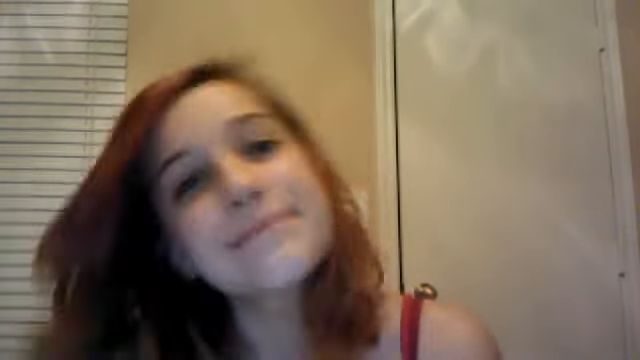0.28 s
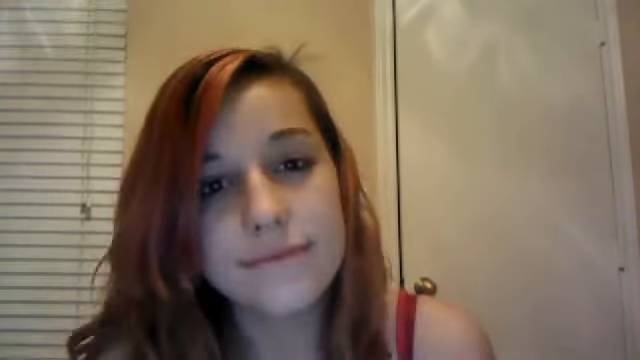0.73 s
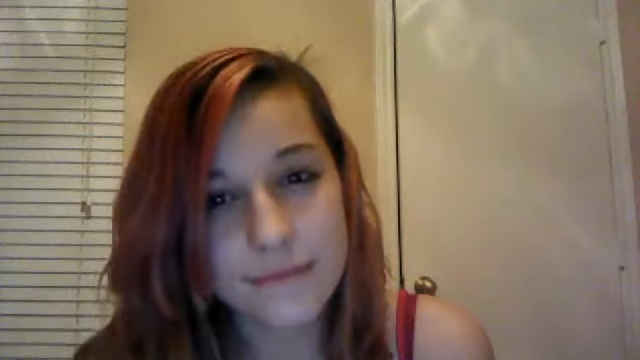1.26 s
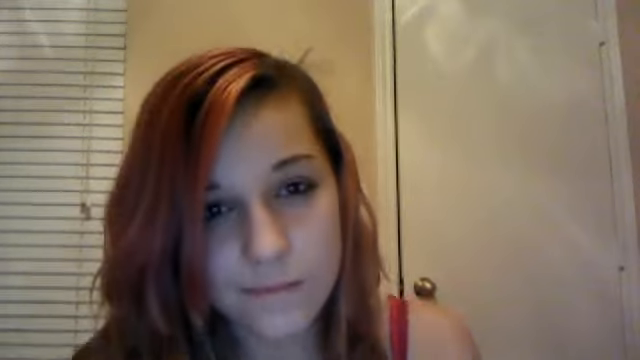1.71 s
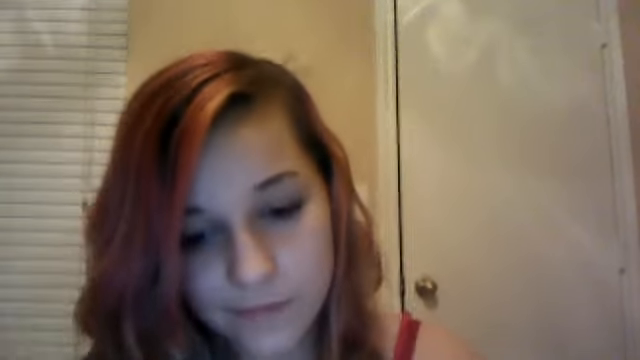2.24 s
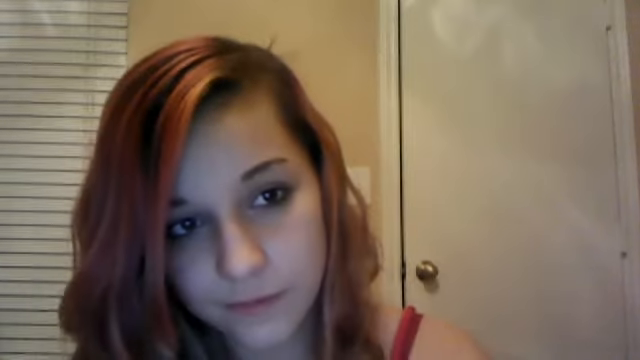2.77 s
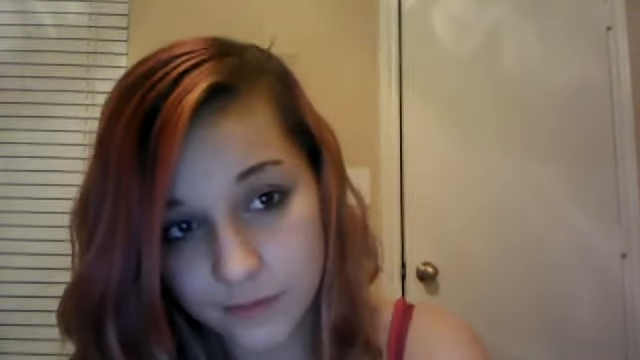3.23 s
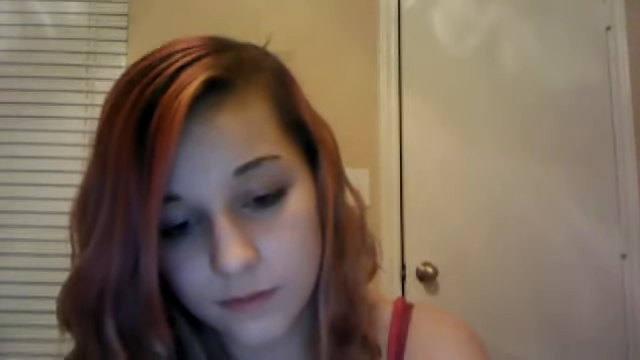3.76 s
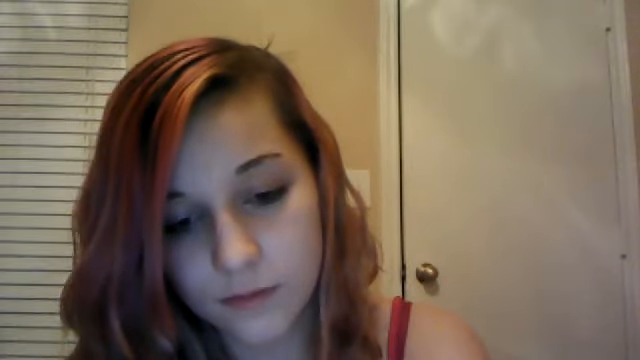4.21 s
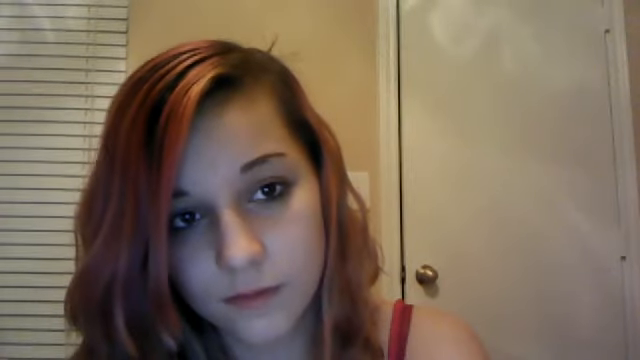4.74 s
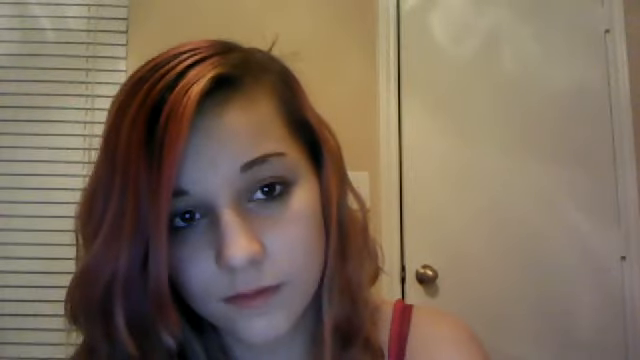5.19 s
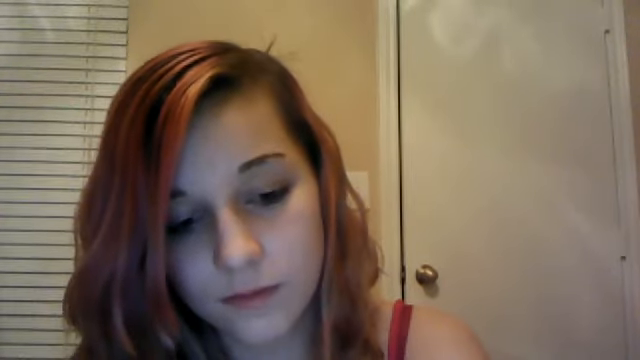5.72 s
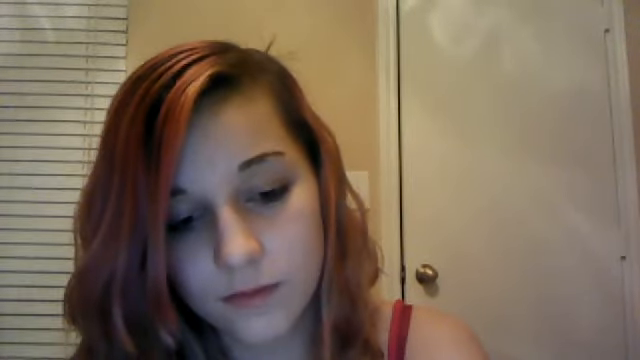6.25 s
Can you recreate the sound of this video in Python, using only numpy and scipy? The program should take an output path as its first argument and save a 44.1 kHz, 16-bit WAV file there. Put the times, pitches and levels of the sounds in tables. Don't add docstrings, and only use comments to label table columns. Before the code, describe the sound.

A quiet room heard by a laptop's built-in microphone: low fan hum, soft rumble, hiss and a faint thin whine whose treble flickers. Only one light tick comes at 0.8 s. At 1.35 s a soft press, at 1.45 s a duller tap, then at 1.61 s a hard, bouncing button snap. Sharp pressure pops follow at about 1.75 s, with a dull swipe of skin at 1.8 s. Small ticks patter from 2.0 to 2.35 s, then strong low key thumps with bright rattles at 2.4, 2.57 and 2.92 s. From 3.3 to 4.5 s strokes come quickly, crisp clicks mixed with case knocks, desk thuds and softer key returns, loudest ticks near 3.6 and 4.3 s. Sparse faint touches and a light brush fill 4.5 to 5.6 s. Firm strokes resume at 5.75, 6.03, 6.2 and 6.39 s, ending under a short scuff and rising slide.

```python
import sys
import numpy as np
from scipy import signal
from scipy.fft import rfft, irfft
from scipy.io import wavfile
from scipy.ndimage import uniform_filter1d

SR = 44100
rng = np.random.default_rng(int(sys.argv[2]) if len(sys.argv) > 2 else 0)


def store_wav(level_fs):
    pcm = np.round(np.clip(np.atleast_2d(level_fs), -1, 1) * 32767)
    wavfile.write(sys.argv[1], SR, pcm.T.astype(np.int16))


def boost_factor(decibels):
    exponent = np.asarray(decibels, float) / 20
    return 10 ** exponent


N = 285327
FRAME = 512

# (time [s], peak [dB], width [ms])
POPS = [
    (1.351, -43, 2.1),
    (1.752, -10, 0.27),
    (1.7713, -9.5, 0.088),
    (1.774, -22, 0.1),
]
# (time [s], dull level [dB], bright level [dB])
SLIDES = [
    [(1.78, -49, -50), (1.814, -28.5, -47), (1.84, -60, -59)],
    [(1.95, -62, -72), (1.976, -50, -53), (2.1, -56.5, -80)],
    [(5.13, -62, -65), (5.16, -55.5, -56), (5.21, -58, -60)],
    [(6.3, -74, -60), (6.334, -42, -49), (6.345, -53, -60)],
    [(6.36, -46, -63), (6.384, -43.5, -41), (6.47, -38.5, -54.5)],
]
# (time [s], peak [dB])
SNAP = [
    (1.6117, -6),
    (1.6135, -8),
    (1.616, -13),
    (1.6185, -19),
]
# (time of greatest swing [s], case level [dB], case pitch [Hz], case swing [ms], desk level [dB])
PRESSES = [(1.352, -28.5, 210, 5.4, -33.5), (1.613, -23, 193, 7.3, -31), (1.769, -39, 190, 8.2, -27.5),
           (2.398, -8.5, 205, 12, -27.5), (2.57, -8.5, 188, 10.3, -18), (2.922, -5, 234, 10.1, -22.5),
           (3.365, -20.5, 224, 28.5, -41), (3.482, -18, 185, 15, -19), (3.592, -16.5, 173, 10.9, -27),
           (3.734, -28.5, 167, 25.4, -20), (3.883, -27, 204, 8.1, -32), (4.007, -21.5, 209, 4.8, -19.5),
           (4.107, -21, 186, 4.9, -15), (4.191, -24, 185, 11.2, -23.5), (4.313, -22.5, 218, 13, -27),
           (5.747, -19, 154, 6.6, -31), (6.035, -14.5, 169, 15.5, -16.5), (6.195, -11.5, 167, 10.9, -19),
           (6.392, -20.5, 206, 3.3, -30.5)]
# (time of greatest swing [s], case level [dB], case pitch [Hz], case swing [ms], desk level [dB])
RELEASES = [(2.474, -28.5, 206, 18.4, -24), (2.633, -25, 166, 14.5, -19.5), (3, -17.5, 187, 7.5, -24),
            (3.633, -17.5, 186, 7.1, -16), (3.826, -20.5, 175, 12.5, -20), (3.927, -21.5, 172, 10.3, -22.5),
            (4.238, -25.5, 171, 28, -17.5), (4.356, -19.5, 223, 20.7, -20), (4.411, -20, 188, 5.6, -24),
            (6.13, -25.5, 212, 9.5, -18.5), (6.268, -16, 178, 4.4, -31), (6.334, -29.5, 186, 4.4, -41)]
# (time [s], tick level [dB], centre [Hz], knock level [dB], rattle level [dB])
STRIKES = [(2.366, -28.5, 3900, -45, -31), (2.389, -24.5, 4270, -27, -30), (2.557, -19, 4300, -26, -25),
           (2.914, -20, 4360, -24, -29), (3.48, -19.5, 4530, -28.5, -25), (3.591, -12.5, 4800, -28.5, -21),
           (3.717, -32.5, 4360, -37.5, -32.5), (3.798, -29, 4370, -37.5, -34.5),
           (4.001, -23.5, 3700, -37.5, -35.5), (4.308, -12, 4200, -31, -35), (4.344, -19, 4200, -26, -25),
           (5.739, -31, 4400, -35.5, -32.5), (6.03, -22, 4400, -33.5, -30.5),
           (6.193, -19, 3700, -31.5, -45), (6.39, -17.5, 3820, -25.5, -43)]
# (time [s], tick level [dB], centre [Hz], knock level [dB])
TOUCHES = [(.832, -29, 4100, -66), (1.447, -21.5, 1870, -32), (1.631, -33, 2950, -36),
           (1.998, -34.5, 2440, -37.5), (2.099, -34, 3850, -65), (2.183, -32.5, 3780, -47),
           (2.223, -30.5, 4770, -42.5), (2.277, -30, 4130, -48), (2.323, -29.5, 3400, -44),
           (2.469, -32.5, 4470, -35.5), (2.637, -30.5, 3400, -34), (2.998, -26, 4200, -32),
           (3.288, -27.5, 3600, -39), (3.359, -15.5, 4140, -39.5), (3.627, -25, 3900, -34),
           (4.106, -16, 2810, -38), (4.188, -39, 2640, -33), (4.232, -32.5, 3050, -39),
           (4.373, -29, 4230, -51), (4.405, -19, 4110, -33), (4.477, -34.5, 3620, -40.5),
           (4.492, -35, 4100, -72), (4.568, -24, 4860, -34.5), (4.775, -28.5, 3500, -45),
           (5.014, -33.5, 4400, -62), (5.836, -32, 4180, -34), (6.134, -20.5, 3670, -37.5),
           (6.271, -29, 4080, -37)]
# (time of greatest swing [s], peak [dB], pitch [Hz], length [ms])
NUDGES = [
    (2.029, -34.5, 181, 18),
    (3.809, -22.5, 150, 5.2),
    (4.326, -17.5, 211, 13.7),
    (4.774, -39, 225, 22),
    (5.151, -44.5, 211, 42),
    (5.771, -29.5, 156, 33.4),
    (5.838, -39.5, 301, 14.5),
    (6.206, -22.5, 353, 13.2),
]


def rms_one(x):
    return x / np.sqrt(np.mean(x ** 2) + 1e-20)


def in_time(rows):
    s, *columns = np.transpose(rows)
    return [np.interp(np.arange(N) / SR, s, c) for c in columns]


def drift(rate):
    r = np.exp(-80 * np.pi * rate / SR)
    slow = signal.lfilter([1], [1, -2 * r, r * r], rng.standard_normal(N // 40 + 2002))
    slow = slow[2000:]
    return np.interp(np.arange(N) / 40, np.arange(len(slow)), rms_one(slow))


def resonance(x, hz, width):
    r = np.exp(-np.pi * width / SR)
    zeros = np.array([1, 0, -1]) * (1 - r * r) / 2
    return signal.lfilter(zeros, [1, -2 * r * np.cos(2 * np.pi * hz / SR), r * r], x)


def coloured(spectrum):
    hz = np.arange(1, N // 2 + 2) * SR / N
    at, db = np.transpose(spectrum)
    gain = boost_factor(np.interp(np.log(hz), np.log(at), db))
    return rms_one(irfft(rfft(rng.standard_normal(N)) * gain, N))


def add(out, s, piece):
    i = round(s * SR)
    out[i:i + len(piece)] += piece[:N - i]


def port(x):
    # (centre [Hz], width [Hz], level [dB])
    cavity = [(2560, 280, -2), (3002, 273, 7), (4060, 190, 0.5), (4600, 710, -6.5), (5160, 1260, 4)]
    return x + sum((boost_factor(db) - 1) * resonance(x, hz, width) for hz, width, db in cavity)


def thumps(rows, shape):
    out = np.zeros(N)
    for s, db, hz, ms in rows:
        rise = ms / 1000 * shape / 3.01
        t = np.arange(round(rise * 7 * SR)) / SR
        swing = (t / rise * np.exp(1 - t / rise)) ** (shape ** 2)
        add(out, s - rise, boost_factor(db) * swing * np.sin(2 * np.pi * (hz * t + rng.random())))
    return out


def busy():
    lead_s, hold_s = 0.015, 0.05
    period_s, jitter_s, spell_s, chance = 0.075, 0.015, 0.055, 0.88
    events = [*TOUCHES, *STRIKES, *PRESSES, *RELEASES, *NUDGES, *SNAP, *POPS]
    spells = [(row[0] - lead_s, lead_s + hold_s) for row in events]
    spells += [(rows[0][0], rows[-1][0] - rows[0][0]) for rows in SLIDES]
    for s in np.arange(jitter_s, N / SR - period_s, period_s):
        slip, stretch, luck = rng.random(3)
        length = spell_s * (0.5 + stretch) * (luck < chance)
        spells.append((s + jitter_s * (2 * slip - 1), length))
    on = np.zeros(N)
    for s, length in spells:
        add(on, s, np.ones(round(length * SR)))
    return uniform_filter1d(np.minimum(on, 1), size=FRAME // 2)


def flicker(spread_db):
    steps = np.repeat(rng.standard_normal(N // FRAME // 2 + 1), 2 * FRAME)[:N]
    return boost_factor(spread_db * uniform_filter1d(steps, size=FRAME))


def room_floor():
    # (time [s], rumble level [dB])
    activity = [(0, -42.5), (.6, -42.5), (1.2, -42.5), (1.75, -36.5), (2.3, -39), (3.05, -42.5), (3.6, -39),
                (4.25, -41.5), (4.6, -41), (5.65, -41.5), (6.47, -37)]
    # (frequency [Hz], density [dB per Hz])
    rumble_spectrum = [(12, -22), (27, -0.5), (40, -4.5), (55, -5), (80, -5.5), (120, -2.5), (185, -13.5),
                       (280, -18.5), (700, -26.5), (900, -49)]
    # (frequency [Hz], density [dB per Hz])
    hiss_spectrum = [(150, -16), (260, -0.5), (340, -1), (650, -4.5), (1450, -10), (2300, -16.5),
                     (3150, -12.5), (3700, -14.5), (5500, -11), (6500, -22.5), (9300, -23.5),
                     (12300, -37.5)]
    # (frequency [Hz], rms level [dB])
    whine_tones = [(4000, -70.5), (5001, -72), (6998, -82), (8000, -71.5), (9001, -85)]
    rumble_db, = in_time(activity)
    hiss_db = -54.5 + 0.26 * (rumble_db + 40)
    hiss = rms_one(port(coloured(hiss_spectrum)))
    t, on = np.arange(N) / SR, busy()
    treble = signal.cheby1(4, 1, [6200, 9350], "band", fs=SR, output="sos")
    top = signal.sosfilt(treble, hiss[::-1])
    hiss = hiss * flicker(1.2) * boost_factor(1.5 * on)
    hiss = hiss + top * boost_factor(1.5) * on * flicker(1.5)

    whine = sum(boost_factor(db + 3) * np.sin(2 * np.pi * hz * t + 1.2 * drift(40)) for hz, db in whine_tones)
    rumble = boost_factor(rumble_db - 4.5 + 0.55 * drift(3.9)) * coloured(rumble_spectrum)
    return rumble + boost_factor(hiss_db + 2.3) * hiss + whine * on * flicker(3.4)


def hum():
    # (frequency [Hz], rms level [dB], wander [per s])
    lines = [(26.9, -49, 2.), (53.8, -46.5, 1.5), (80, -57, 4.), (105, -57, 4.), (118.8, -51, 2.),
             (748, -70, 2.), (807.5, -63, .7), (1244, -70, 2.), (1620, -73, 2.), (3241, -69, 3.),
             (5399, -73, 3.)]
    out, t = np.zeros(N), np.arange(N) / SR
    for hz, db, rate in lines:
        swell = boost_factor(db + 1.5 + 1.8 * drift(rate))
        out += swell * np.sin(2 * np.pi * hz * t + 0.4 * drift(rate))
    return out


def contacts():
    touch_ms, strike_ms, rattle_ms = 1.54, 1.34, 3.8
    gap_s, jitter_s, loss_db = 0.0092, 0.0015, 4
    rows = [(s, db, hz, touch_ms, knock_db) for s, db, hz, knock_db in TOUCHES]
    for s, db, hz, knock_db, rattle_db in STRIKES:
        rows.append((s, db, hz, strike_ms, knock_db))
        for k in range(2):
            at = s + gap_s * (k + 1) + jitter_s * rng.standard_normal()
            rows.append((at, rattle_db - loss_db * k, hz * 0.83, rattle_ms, knock_db - 12.5))
    return rows


def key_ticks():
    # (centre [Hz], width [Hz], level [dB])
    case_modes = [(350, 330, 4), (542, 122, 10.5), (764, 350, -1.5), (1440, 62, -1.5), (1860, 530, -9.5)]
    halo_db, halo_ms = -17, 8.7
    clatter_db, clatter_ms = -15, 10.7
    spread, cap_width, cap_db = 0.76, 0.064, -10
    rows = contacts()
    bright, dull = np.zeros(N), np.zeros(N)
    t = np.arange(-700, 1500) / SR
    grit = rng.standard_normal((len(rows), 2, len(t)))
    clumps = boost_factor(2.5 * rng.standard_normal((len(rows), 2, 50)))
    grit = grit * np.repeat(clumps, 44, axis=2)
    for (s, db, hz, ms, knock_db), (fine, coarse) in zip(rows, grit):
        burst = np.exp(np.where(t < 0, t / 0.00015, -t / (ms / 1000)))
        burst += boost_factor(halo_db) * np.exp(-((t * 1000 - 1.5) / halo_ms) ** 4)
        burst += boost_factor(clatter_db) * (t > 0) * np.exp(-np.abs(t) * 1000 / clatter_ms)
        rattle = resonance(resonance(fine * burst, hz, hz * spread), hz, hz * spread)
        rattle = rattle + boost_factor(cap_db) * resonance(rattle, hz, hz * cap_width)
        add(bright, s - 0.0007 + t[0], boost_factor(db) * rattle)
        thud = np.exp(np.where(t < 0, t / 0.0022, -t / 0.0097))
        add(dull, s + t[0], boost_factor(knock_db) * coarse * thud)
    knocks = np.zeros(N)
    for k, (hz, width, db) in enumerate(case_modes):
        knocks += boost_factor(db) * resonance(dull, hz, width) * (-1) ** k
    return boost_factor(0.5) * port(bright) + boost_factor(9.0) * knocks


def pops():
    out, t = np.zeros(N), np.arange(-300, 300) / SR
    for s, db, ms in POPS:
        add(out, s + t[0], boost_factor(db) / (1 + (t * 1000 / ms) ** 2))
    return signal.sosfilt(signal.butter(1, [120, 2500], "band", fs=SR, output="sos"), out)


def key_swings():
    case, desk = [], []
    for rows, desk_lag_s in ((PRESSES, 0.0035), (RELEASES, -0.0035)):
        for s, db, hz, ms, desk_db in rows:
            rebound_db = -24.5 + 0.58 * (db + 18) - 0.13 * max(ms - 14, 0)
            case.append((s, db, hz, ms))
            case.append((s + 0.01694, rebound_db, hz * 0.91, 11.36))
            desk.append((s + desk_lag_s, desk_db, 100.7 + 3 * rng.standard_normal(), 28.1))
    return case, desk


def case_overtone(case):
    upper = [(s, -40 + 0.79 * (db + 16.5), hz * 2.123, 9.56) for s, db, hz, ms in case]
    return thumps(upper, shape=1.16)


def desk_sway():
    # (time of greatest swing [s], peak [dB], pitch [Hz], length [ms])
    sways = [
        (1.45, -37, 38.3, 39),
        (1.615, -22.5, 43.4, 16),
        (1.775, -29.5, 35, 46),
        (2.05, -31.5, 29.2, 107),
        (2.58, -17.5, 45, 17),
        (2.93, -23.5, 45, 31),
        (4.35, -28, 40.3, 65),
        (6.04, -56, 45, 63),
        (6.2, -21, 45.7, 41),
    ]
    return thumps(sways, shape=1.22)


def button_snap():
    # (frequency [Hz], level [dB], t60 [s])
    button_modes = [(596, -3, 0.064), (765, -3.5, 0.04), (1295, 6.5, 0.03), (2300, -7.5, 0.0099),
                    (2800, -3.5, 0.012), (4100, -0.5, 0.012), (5100, -6, 0.0066), (6520, -1.5, 0.0049),
                    (7800, 1.5, 0.0075), (9980, -5.5, 0.0062)]
    hits, t = np.zeros(N), np.arange(-700, 700) / SR
    for s, db in SNAP:
        add(hits, s, boost_factor(db + 1.5) * rng.choice([-1, 1], 120) * np.exp(-np.arange(120) / 8))
    blur = np.exp(-(t / 0.0039) ** 4) + 0.22 * np.exp(-(t / 0.013) ** 8)
    add(hits, SNAP[0][0] + t[0], boost_factor(-27.5) * rng.standard_normal(len(t)) * blur)
    out = np.zeros(N)
    for k, (hz, db, t60) in enumerate(button_modes):
        out += boost_factor(db + 12.5) * resonance(hits, hz, 4.1 / t60) * (-1) ** k
    return out


def slides():
    grains = boost_factor(2.3 * rng.exponential(1, (2, N))) * rng.choice([-1, 1], (2, N))
    grains = grains * (rng.random((2, N)) < 6000 / SR)
    dull = resonance(grains[0], 520, 680) - resonance(grains[0], 880, 230)
    dull = dull + 0.38 * resonance(grains[0], 1430, 770)
    dull = rms_one(resonance(dull, 730, 1570))
    bright = rms_one(port(resonance(resonance(grains[1], 3600, 7600), 3600, 5300)))
    out, t = np.zeros(N), np.arange(N) / SR
    for rows in SLIDES:
        dull_db, bright_db = in_time(rows)
        fade_s = 0.008
        inside = np.clip(np.minimum(t - rows[0][0], rows[-1][0] + fade_s - t) / fade_s, 0, 1)
        out += inside * (boost_factor(dull_db) * dull + boost_factor(bright_db) * bright)
    return out


def palm_nudges():
    return thumps(NUDGES, shape=1.16)


def scene():
    case, desk = key_swings()
    low = desk_sway() + thumps(desk, shape=1.19) + thumps(case, shape=1.41)
    keys = low + key_ticks() + button_snap()
    around = pops() + slides() + hum() + room_floor()
    return (keys + case_overtone(case) + palm_nudges() + around)[None]


def roll_off(x):
    return signal.sosfilt(signal.butter(12, 12010, fs=SR, output="sos"), x)


def record(dry):
    hz = np.arange(N // 2 + 1) * SR / N
    edge_hz = [9300, 9500, 10650, 10850, 11280, 11420, 12300, 12500]
    edge_db = np.interp(hz, edge_hz, [0.5, -9.5, -8.0, -42, -45, -13.0, -36, -80])
    mix = irfft(rfft(dry) * boost_factor(edge_db), N)
    return roll_off(mix)


dry = scene()
out = record(dry)
store_wav(out)
```